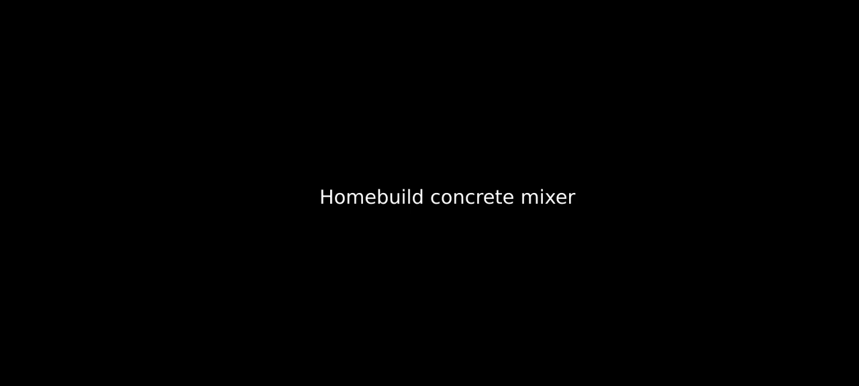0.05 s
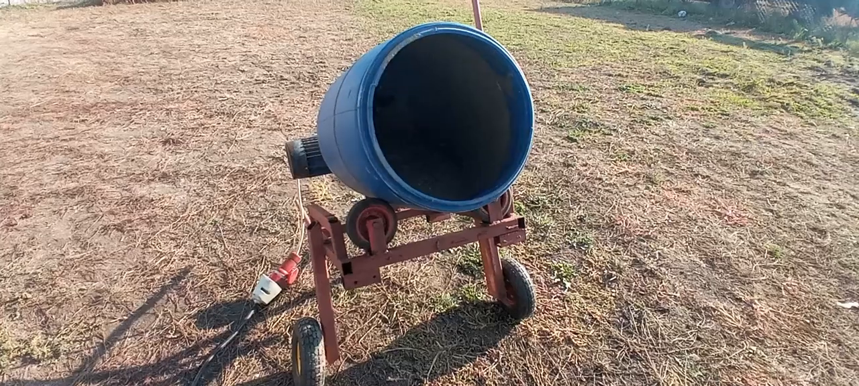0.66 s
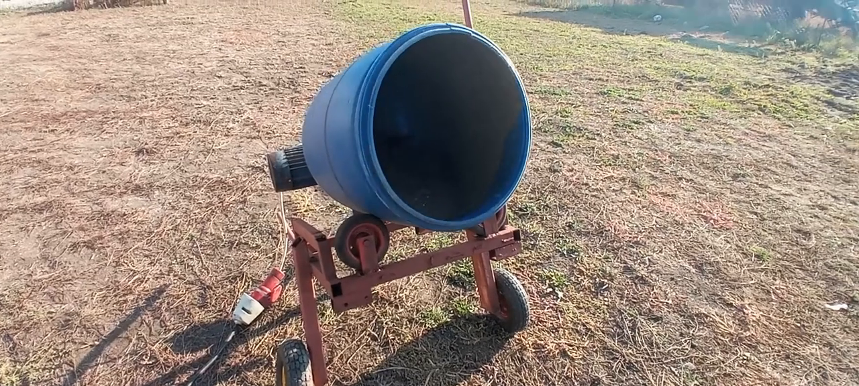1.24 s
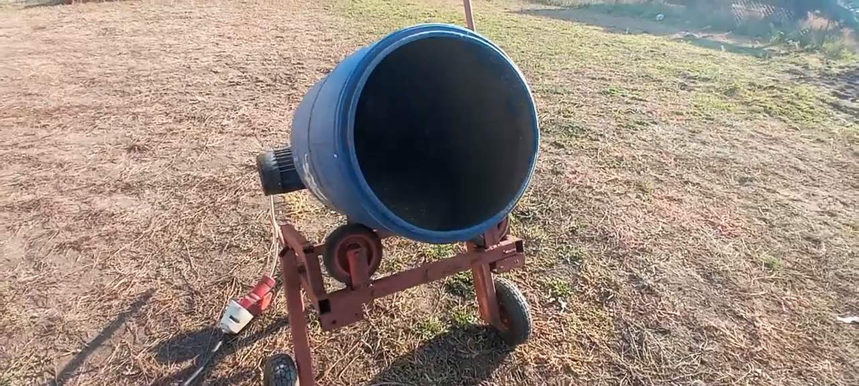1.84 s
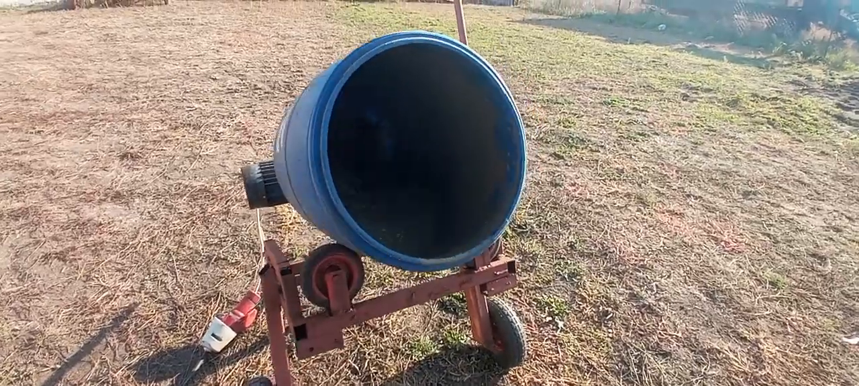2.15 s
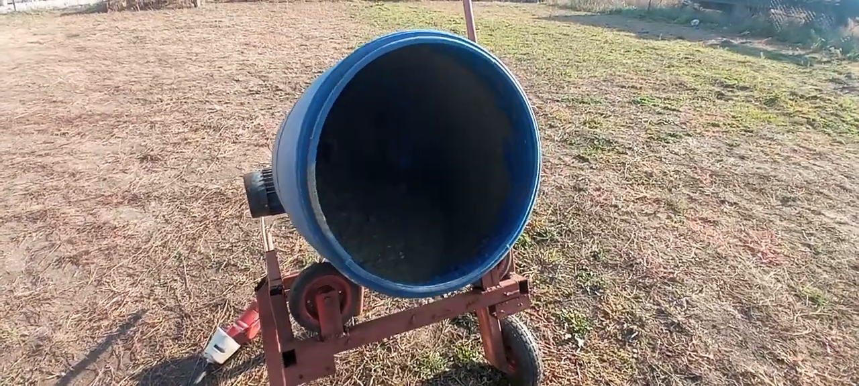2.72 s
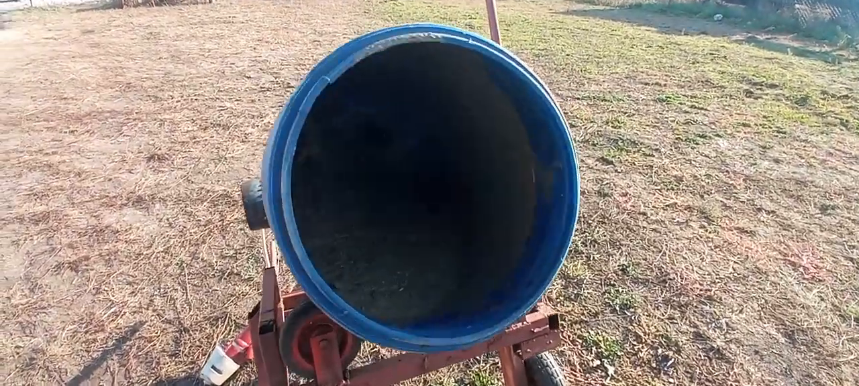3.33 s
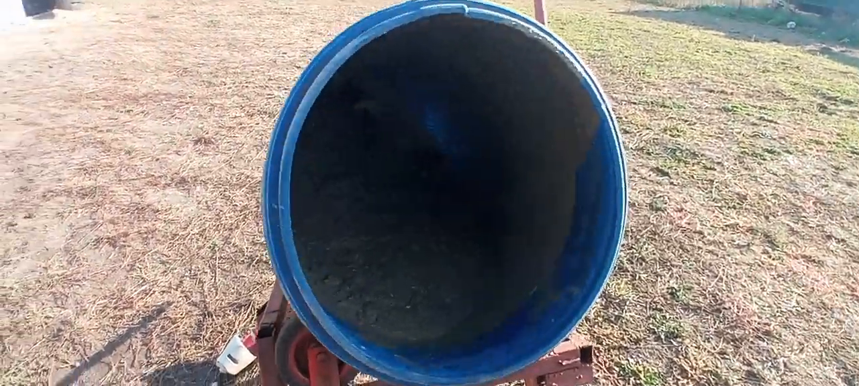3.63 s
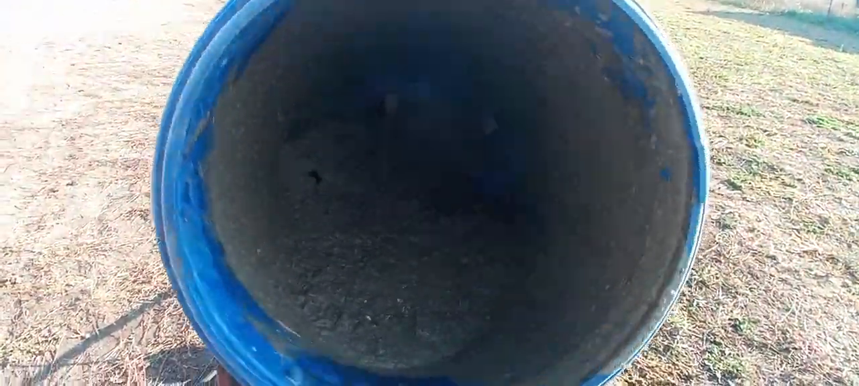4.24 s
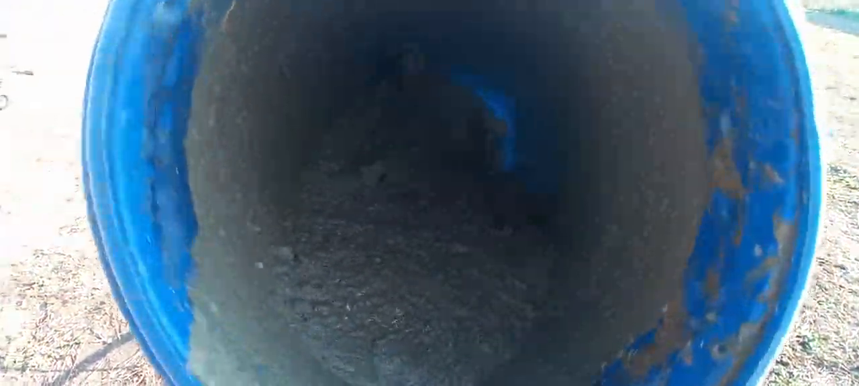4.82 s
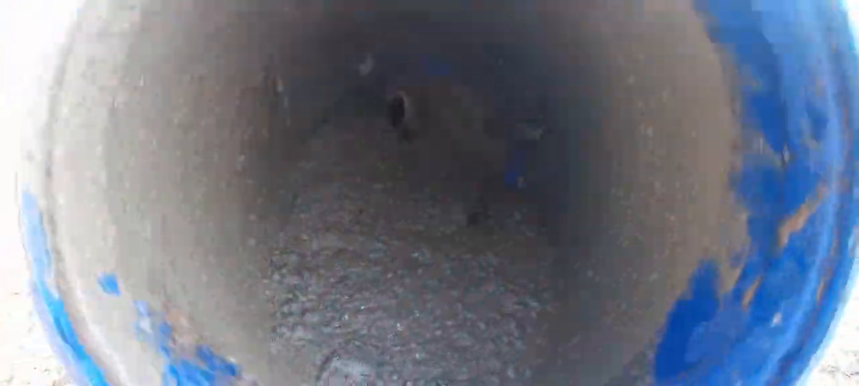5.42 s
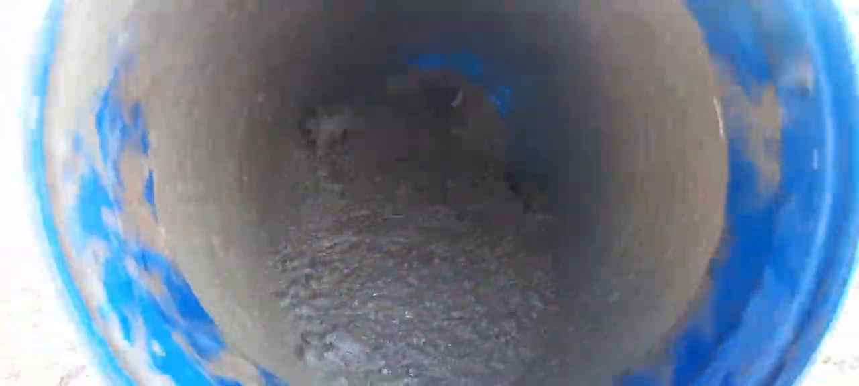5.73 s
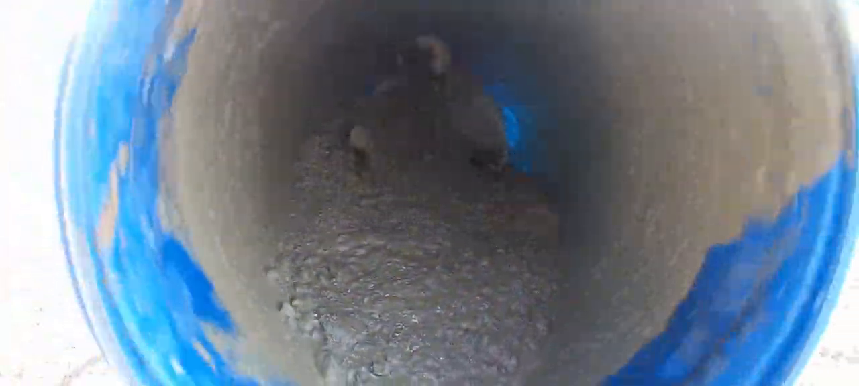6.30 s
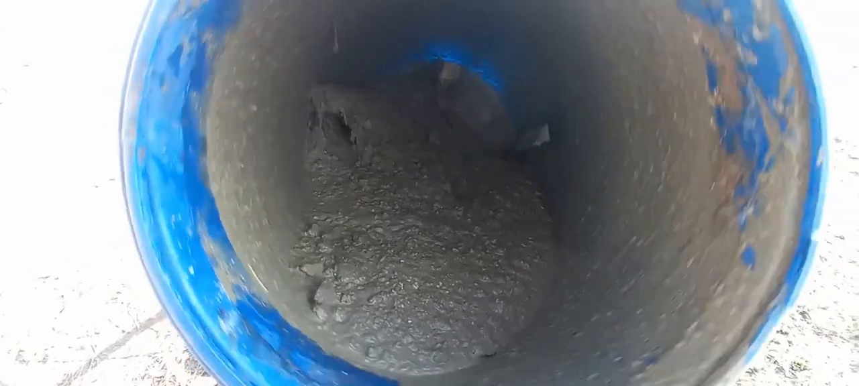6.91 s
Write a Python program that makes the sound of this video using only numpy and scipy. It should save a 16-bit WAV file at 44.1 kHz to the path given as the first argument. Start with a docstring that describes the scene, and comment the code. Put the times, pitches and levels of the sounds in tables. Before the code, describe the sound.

After silence, a concrete mixer fades in quickly at about 0.6 seconds, outdoors with no echo. Close by, its geared electric motor rattles steadily with a thin high ring, and a whine swells about every 1.2 seconds, strongest near 6 seconds. A loose steel part clinks at 0.7 seconds and again at 3.4. Wet, gritty concrete churns and scrapes in the plastic barrel, quietly at first, with scattered pebble scratches, stone knocks and crumbling clods from about 1 second. A dense, louder cluster of knocks and falling grit comes around 4 seconds. From about 3 to 5 seconds the microphone moves up to the barrel's mouth: the motor recedes a little, while the churning, sandy hiss and hollow ringing rumble grow and take over. The load slumps with soft low thumps, and stones keep knocking until the end at about 7 seconds.

```python
"""A home-built concrete mixer turns on dry grass. The sound fades in beside the geared electric motor,
which rolls a plastic barrel, whining and rattling harder once in each turn. Wet, gritty concrete
churns and scrapes along the wall. The frame clinks, then pebbles scratch, stones knock and clods break
off. Midway the frame clinks again. The listener walks on up to the barrel's mouth, where the hollow
ringing of the air inside takes over."""
import sys
import numpy as np
from scipy import signal
from scipy.fft import rfft, irfft
from scipy.io import wavfile
from scipy.ndimage import uniform_filter1d

SR = 44100
rng = np.random.default_rng(int(sys.argv[2]) if len(sys.argv) > 2 else 0)


def to_wav(s):
    """Save 16-bit WAV."""
    ch = np.atleast_2d(s).T  # columns
    pcm = np.round(np.clip(ch, -1, 1) * 32767)  # PCM
    wavfile.write(sys.argv[1], SR, pcm.astype(np.int16))


N = 311346
TIME = np.arange(N) / SR

# the walk from motor to mouth, as relative levels: (time [s], gears [dB], housing [dB], churning [dB])
WALK = [(.6, -29.5, -37.5, -45), (.95, -32.5, -35, -44.5), (1.5, -29.5, -37, -41.5), (2.2, -31, -45, -40.5),
        (3.2, -31, -42, -36), (3.9, -31.5, -40.5, -32), (4.5, -34, -50, -30), (4.85, -38.5, -47, -26.5),
        (5.4, -34, -57, -25.5), (6.1, -32.5, -50, -26), (6.7, -36, -55, -26), (7.05, -34, -56, -28)]
# the gear whine swells once in each turn: (time [s], level [dB])
WHINE_SWELLS = [(1.0, -36.5), (2.25, -33), (3.58, -31), (4.66, -33.5), (5.93, -28), (6.96, -35.5)]
# ringing notes of the gearbox and frame, the motor housing, the barrel's air and a loose steel part:
# (pitch [Hz], width [Hz], relative level [dB])
GEARBOX_NOTES = [(296, 11, -12.5), (418, 33, -14), (672, 49, -2.5), (739, 110, -2.5), (828, 53, 1.5),
                 (1090, 88, -29), (1518, 57, -5.5), (1612, 38, 2), (1650, 22, -4), (2180, 310, -12),
                 (2780, 420, -13), (3650, 430, -15.5), (6000, 1200, -47)]
HOUSING_NOTES = [(3476, 22, -10.5), (3658, 28, -6.5), (3750, 34, -14), (3870, 48, -15)]
BARREL_NOTES = [(298.4, 14.2, 0), (429.2, 7.4, 12), (501, 17.5, 6), (523.5, 13.8, 8.5), (620, 55, -11),
                (771, 84, 0), (1439, 36, -0.5)]
STEEL_NOTES = [(1720, 180, -7), (2040, 90, -1.5), (2244, 54, 4), (2510, 170, -8)]
# tone colours of churning concrete, scraping sand, a crumbling clod and a stone's clack:
# (frequency [Hz], relative level [dB])
CHURN_COLOUR = [(80, -58), (130, -28), (220, -19.5), (370, -27.5), (560, -3.5), (900, 1.5), (1200, -4),
                (1500, -6.5), (1900, -8.5), (2500, -15), (3300, -16), (4200, -22), (8000, -36.5)]
SAND_COLOUR = [(400, -29.5), (1000, -1), (2000, 1), (3300, 8.5), (3900, -1.5), (4500, -7), (5550, -0.5),
               (6500, -4), (7400, -2.5), (8500, -13), (9600, -21.5), (12500, -10.5), (15500, -17)]
CLOD_COLOUR = [(60, -39), (100, -7), (200, -25), (400, -1.5), (1000, 5), (1700, -1), (3000, 6.5),
               (4300, -3), (5600, -2), (7400, -2.5), (9300, -18.5), (12500, -14), (15500, -22.5)]
CLACK_COLOUR = [(70, -32), (110, -37), (350, -33), (700, -7), (950, -12), (1400, 18), (2200, -46),
                (3300, -30), (5000, -2), (9000, -36), (15000, -28)]
# the barrel rumbles louder towards its mouth: (time [s], deepest note [dB], higher notes [dB])
RUMBLE_LEVELS = [(.8, -54.5, -49), (1.2, -44, -45), (1.7, -55.5, -58), (2.2, -46, -49), (2.75, -43.5, -49),
                 (3.15, -51, -50), (3.8, -44, -40.5), (4.3, -43.5, -34.5), (4.75, -42, -27.5),
                 (5.45, -37, -28.5), (6.05, -39, -26.5), (7.05, -40, -31.5)]
# sand scraping along the wall: (time [s], relative level [dB])
SAND_LEVELS = [(0.8, -44), (0.9, -48.5), (1.34, -40.5), (1.86, -47), (2.66, -39.5), (3.03, -44.5),
               (3.32, -42.5), (4.04, -36), (4.33, -40), (4.59, -39.5), (5.05, -36.5), (5.92, -39),
               (6.28, -35.5), (7.05, -38.5)]
# the loose steel part clinks: (time [s], first touch's peak [dB])
CLINKS = [(.733, -11), (3.414, -10)]
# pebbles scratch along the wall: (time [s], level [dB], pitch [Hz])
SCRATCHES = [(1.123, -30, 4220), (1.518, -28, 4850), (1.83, -25, 2630), (2.08, -33, 6600),
             (2.702, -30, 5100), (3.935, -20, 5140), (4.003, -20, 5630), (4.742, -26, 5500),
             (6.201, -26, 6100)]
# the load slumps off the rising wall: (time [s], boom level [dB])
SLUMPS = [(1.13, -65), (1.9, -67), (2.39, -54), (2.71, -53), (2.86, -57), (3.4, -52), (3.76, -59),
          (3.94, -42.5), (4.2, -55), (4.36, -50), (4.73, -64), (4.85, -53), (5.0, -50), (5.27, -55),
          (5.65, -47), (6.01, -48), (6.13, -60), (6.3, -54), (6.56, -68)]
# stones and lumps hit the wall, heavier ones sounding lower: (time [s], relative peak [dB], pitch [Hz])
KNOCKS = [(1.141, -20, 790), (1.265, -20.5, 770), (1.408, -12.5, 3800), (2.097, -22.5, 790),
          (2.113, -18, 815), (2.397, -15, 814), (2.417, -15, 870), (2.448, -16.5, 850),
          (2.721, -12.5, 1020), (2.732, -27.5, 214), (2.733, -11.5, 2900), (3.921, -4.5, 2860),
          (3.95, -10, 2380), (3.96, -27.5, 233), (3.96, -10, 2000), (4.001, -6.5, 970), (4.004, -13, 890),
          (4.013, -11.5, 1110), (4.035, -10.5, 1220), (4.124, -14, 2300), (4.191, -10.5, 965),
          (4.349, -13, 1250), (4.901, -10.5, 910), (5.156, -17, 2600), (5.652, -10.5, 1350),
          (5.699, -13.5, 1350), (6.088, -11.5, 800), (6.145, -13, 1870), (6.166, -12, 835),
          (6.24, -10.5, 870), (6.25, -17.5, 800), (6.591, -8.5, 1030)]
# clods break off and slide: (time [s], relative level [dB], rough length [s], brightness [dB/octave])
CLODS = [(1.365, -36.5, .012, 7), (1.404, -28.5, .002, 1), (1.423, -29, 0.034, 1.5),
         (1.509, -32, 0.04, 1.5), (2.531, -25.5, 0.0089, -1), (2.722, -21.5, 0.0081, -1.5),
         (2.727, -25, 0.017, 1), (2.899, -29, 0.033, -0.5), (3.3, -36, .016, 10), (3.918, -18.5, 0.0072, 0),
         (3.933, -20.5, 0.005, -1.5), (3.949, -22, 0.02, -3.5), (4.001, -23, 0.0054, .5),
         (4.011, -22.5, 0.013, 2), (4.03, -25, 0.028, -2.5), (4.076, -27, 0.039, -1),
         (4.118, -23, 0.015, -1), (4.17, -24.5, 0.016, -2.5), (4.232, -35, .014, 5),
         (4.348, -28.5, 0.078, -3), (4.894, -30, 0.022, 4), (5.155, -17.5, 0.011, 1),
         (5.182, -23.5, 0.025, -2), (5.242, -28, 0.06, 0.5), (5.75, -33, .019, 4), (6.037, -22, .004, -1),
         (6.139, -26, 0.0073, 1), (6.162, -24.5, .01, -2), (6.402, -29.5, .0079, 5), (6.502, -30, .01, 4),
         (6.588, -24.5, 0.0063, -4.5), (6.609, -22.5, 0.014, -0.5), (6.722, -23, .0082, -2.5)]


def from_db(db):
    """Turn decibels into a gain."""
    return 10 ** (np.asarray(db) / 20)


def unit_power(x):
    """Scale a sound to an average power of one."""
    return x / np.sqrt(np.mean(x ** 2) + 1e-20)


def evened(x, size):
    """Hold the power near one over stretches of that many samples."""
    return x / np.sqrt(uniform_filter1d(x ** 2, size=size) + 1e-12)


def curves(rows):
    """Join a table's points in time with straight lines, one curve for each level column."""
    times, *columns = np.transpose(rows)
    return [np.interp(TIME, times, column) for column in columns]


def drift(hz, step=40):
    """A smooth random wobble, about 1 in size; more hz makes it quicker."""
    r = np.exp(-2 * np.pi * hz * step / SR)
    slow = signal.lfilter([1], [1, -2 * r, r * r], rng.standard_normal(N // step + 2002))[2000:]
    return np.interp(np.arange(N) / step, np.arange(len(slow)), unit_power(slow))


def coloured_tap(colour, tilt=0, size=4096):
    """One tap with this tone colour, made brighter by tilt dB per octave around 2 kHz."""
    hz, db = np.transpose(colour)
    octave = np.log2(np.maximum(np.arange(size // 2 + 1) * SR / size, 1))
    shape_db = np.interp(octave, np.log2(hz), db) + tilt * np.maximum(octave - np.log2(2000), -4)
    cepstrum = irfft(np.log(from_db(shape_db)))
    cepstrum[1:size // 2] *= 2   # folding it packs the energy at the start of the tap
    cepstrum[size // 2 + 1:] = 0
    return unit_power(irfft(np.exp(rfft(cepstrum)))) / np.sqrt(size)


def through(x, tap):
    """Let every sample of x set off a copy of the tap."""
    return signal.oaconvolve(x, tap)[:len(x)]


def resonance(x, hz, width):
    """Ring at one pitch; a smaller width [Hz] rings longer."""
    r = np.exp(-np.pi * width / SR)
    feedback = [1, -2 * r * np.cos(2 * np.pi * hz / SR), r * r]
    return signal.lfilter(np.array([1, 0, -1]) * (1 - r * r) / 2, feedback, x + 1e-18)


def narrow_noise(hz, width, size=N):
    """Noise gathered around one pitch."""
    return resonance(resonance(rng.standard_normal(size), hz, width), hz, width)


def keep_side(x, hz, side, order=4):
    """Keep what lies on the "high" or "low" side of hz."""
    return signal.sosfilt(signal.butter(order, hz, side, fs=SR, output="sos"), x)


def grains(per_s, spread_db, size=N):
    """Tiny clicks of unequal strength at random moments."""
    strength = from_db(spread_db * np.minimum(rng.exponential(1, size), 4)) * rng.choice([-1, 1], size)
    return unit_power(strength * (rng.random(size) < per_s / SR))


def ringing(clicks, notes):
    """Every click rings each note with a random strength of its own."""
    return sum(from_db(db) * resonance(clicks * rng.standard_normal(N), hz, width)
               for hz, width, db in notes)


def gear_whine(gear_db, mesh_hz=844.8, floor_db=-39.5, swell_s=0.17):
    """Gear teeth meet at a nearly steady rate; the tone swells and flutters under load."""
    phase = 2 * np.pi * np.cumsum(mesh_hz + 0.83 * drift(4.9)) / SR
    swells = sum(from_db(db) * np.exp(-((TIME - s) / swell_s) ** 2) for s, db in WHINE_SWELLS)
    flutter = from_db(3 * drift(8.6) + 3 * drift(70))
    tone = (from_db(floor_db) + swells) * flutter * np.sin(phase)
    even_octave = np.sqrt(2) * from_db(gear_db - 14.5) * np.sin(2 * phase)
    return tone + even_octave


def gear_rattle(turn_s=1.22, heaviest_s=1.07, swing_db=2):
    """Slack teeth clatter; the five lowest notes ring harder as each turn lifts the load."""
    teeth = grains(3000, spread_db=1) * from_db(2 * drift(91))
    load = np.cos(2 * np.pi * (TIME - heaviest_s) / turn_s)
    deep = from_db(swing_db * load) * ringing(teeth, GEARBOX_NOTES[:5])
    rattle = deep + ringing(teeth, GEARBOX_NOTES[5:])
    rattle = keep_side(keep_side(rattle, 264, "high", order=6), 7000, "low")
    return unit_power(rattle - resonance(rattle, 1790, 230))   # the frame barely moves at this pitch


def housing_ring():
    """The running motor keeps its thin housing ringing."""
    shaking = grains(2000, spread_db=-0.5) * from_db(0.5 * drift(60))
    return unit_power(keep_side(ringing(shaking, HOUSING_NOTES), 3240, "high"))


def barrel_rumble(slumps):
    """The tumbling load rings the barrel's air: the deepest note spreads, the rest beam from the mouth."""
    tumbling = grains(2500, spread_db=2) * from_db(2.5 * drift(4.5))
    deep_db, high_db = curves(RUMBLE_LEVELS)
    deep_gain = from_db(deep_db) + from_db(7) * slumps
    deep = deep_gain * evened(ringing(tumbling, BARREL_NOTES[:1]), size=16000)
    high = from_db(high_db) * evened(ringing(tumbling, BARREL_NOTES[1:]), size=12000)
    return keep_side(keep_side(deep + high, 245, "high"), 2530, "low")


def barrel_boom(slumps, nearness_db, air_hz=106.3, wall_hz=148):
    """All the barrel's air sways through its mouth as the load moves; the wall flexes with it."""
    strength = from_db(-57.5 + 1.6 * nearness_db + 2.4 * drift(12)) + slumps
    sway = evened(narrow_noise(air_hz, width=11.6), size=3000)
    flex = from_db(-4.5) * unit_power(narrow_noise(wall_hz, width=57))
    return keep_side(strength * (sway + flex), 90, "high")


def sliding(colour, per_s, spread_db, clump_db, clump_hz):
    """Sand and gravel rub past each other in clumps."""
    rubbing = grains(per_s, spread_db) * from_db(clump_db * drift(clump_hz))
    return unit_power(through(rubbing, coloured_tap(colour)))


def sand_scrape(sand_db, nearness_db):
    """Sand scrapes the wall; its sizzle and its finest hiss beam out of the mouth."""
    sand = sliding(SAND_COLOUR, per_s=14000, spread_db=-1, clump_db=1.5, clump_hz=7.7)
    sand *= from_db(sand_db + 3.5)
    sand += from_db(nearness_db + 0.5) * resonance(sand, 5360, 830)
    return sand + from_db(0.33 * nearness_db - 8.5) * resonance(sand, 11800, 5000)


def low_hush():
    """A soft, deep rushing noise."""
    return unit_power(keep_side(rng.standard_normal(N), 130, "low", order=2))


def crumbs(per_s=26, settle_s=0.0098):
    """Small crumbs drop at random, each a brief puff of grit."""
    settling = np.exp(-np.arange(4096) / SR / settle_s)
    puffs = through(np.abs(grains(per_s, spread_db=3.5)), settling)
    return unit_power(through(puffs * rng.standard_normal(N), coloured_tap(CLOD_COLOUR, tilt=1.5)))


def clinks(bounce_s=0.0065, loss_db=2.4, touches=7):
    """A loose steel part rings briefly and bounces unevenly, weaker each time."""
    clicks, tap = np.zeros(N), signal.unit_impulse(4096)
    for s, db in CLINKS:
        for k in range(touches):
            delay = bounce_s * (k + rng.uniform(-0.13, 0.323) * (k > 0))
            clicks[round((s + delay) * SR)] += from_db(db - loss_db * k)
    ring = sum((-1) ** k * from_db(db) * resonance(tap, hz, width)
               for k, (hz, width, db) in enumerate(STEEL_NOTES))
    return through(clicks, ring / np.abs(ring).max())


def scratches(width_hz=1200, rise_s=0.0023, size=4096):
    """A dragged pebble chirps for a moment around one pitch."""
    out, age = np.zeros(N + size), np.arange(size) / SR / rise_s
    for s, db, hz in SCRATCHES:
        chirp = unit_power(narrow_noise(hz, width_hz, size))
        at = round(s * SR)
        out[at:at + size] += from_db(db) * chirp * age * np.exp(1 - age)
    return out[:N]


def slumping(rise_s=0.014, fall_s=0.047):
    """How hard the load slumps over time: each slump swells quickly and dies away."""
    strength = np.zeros(N)
    for s, db in SLUMPS:
        rise = np.clip((TIME - s) / rise_s, 0, 1)
        fall = np.exp(-np.maximum(TIME - s - rise_s, 0) / fall_s)
        strength += from_db(db) * rise * fall
    return strength


def knocks(damping=0.33, clack_db=-13, size=4096):
    """The plastic wall rings for a few cycles where a stone hits, over a short, bright clack."""
    clack = coloured_tap(CLACK_COLOUR)
    out, tap = np.zeros(N + size), signal.unit_impulse(size)
    for s, db, hz in KNOCKS:
        ring = resonance(resonance(tap, hz, damping * hz), hz, 2 * damping * hz)
        blow = ring / np.abs(ring).max() + from_db(clack_db) * clack / np.abs(clack).max()
        at = round(s * SR)
        out[at:at + size] += from_db(db) * blow / np.abs(blow).max()
    return out[:N]


def inside_barrel(hits):
    """Hits on the wall, with the barrel's air ringing on briefly after each."""
    hits = keep_side(hits, 110, "high")
    return hits + from_db(-1.5) * sum(resonance(hits, hz, width) for hz, width, _ in BARREL_NOTES)


def clods(crumble_s=0.017, size=8192):
    """Each clod scrapes down in a burst of grit with a few random pitches, then its crumbs settle."""
    out, age = np.zeros(N + size), np.arange(size) / SR
    for s, db, length, brightness in CLODS:
        rise = np.minimum(age / (0.0025 + 0.045 * length), 1)
        fall = np.exp(-np.maximum(age - 0.67 * length, 0) / crumble_s)
        grit = grains(per_s=12000, spread_db=4, size=size)
        ring = sum(resonance(grit, hz, 137) for hz in rng.uniform(580, 6050, size=4))
        slide = unit_power(grit + from_db(-3.5) * ring) * rise * fall
        at = round(s * SR)
        out[at:at + size] += from_db(db) * through(slide, coloured_tap(CLOD_COLOUR, brightness))
    return out[:N]


def scene():
    """Motor, load and barrel in the open air, with no room around them."""
    gear_db, housing_db, churn_db = curves(WALK)
    sand_db, = curves(SAND_LEVELS)
    nearness_db = churn_db + 24.5   # 0 dB would be right at the mouth
    slumps = slumping()
    whine = gear_whine(gear_db)
    rattle = from_db(gear_db - 0.4) * gear_rattle()
    housing = from_db(housing_db + 0.5) * housing_ring()
    barrel = barrel_rumble(slumps) + barrel_boom(slumps, nearness_db)
    churn = sliding(CHURN_COLOUR, per_s=2200, spread_db=1.5, clump_db=1.74, clump_hz=22)
    concrete = from_db(churn_db) * churn + sand_scrape(sand_db, nearness_db)
    hush = from_db(0.8 * nearness_db - 74) * low_hush()
    grit = from_db(sand_db + 0.1 * nearness_db - 3) * crumbs()
    hits = inside_barrel(clods() + knocks()) + scratches() + clinks()
    return (whine + rattle + housing + barrel + concrete + hush + grit + hits)[None]


def record(dry):
    """After a silence the sound fades in quickly; the highest treble is cut away."""
    start_s, top_hz = 0.602, 15800
    fade = (TIME >= start_s) * np.clip(0.055 + (TIME - start_s) / 0.32, 0, 1)
    treble_cut = signal.ellip(12, .1, 90, top_hz, fs=SR, output="sos")
    return signal.sosfilt(treble_cut, dry * fade + 1e-18)


dry = scene()
out = record(dry)
to_wav(out)
```